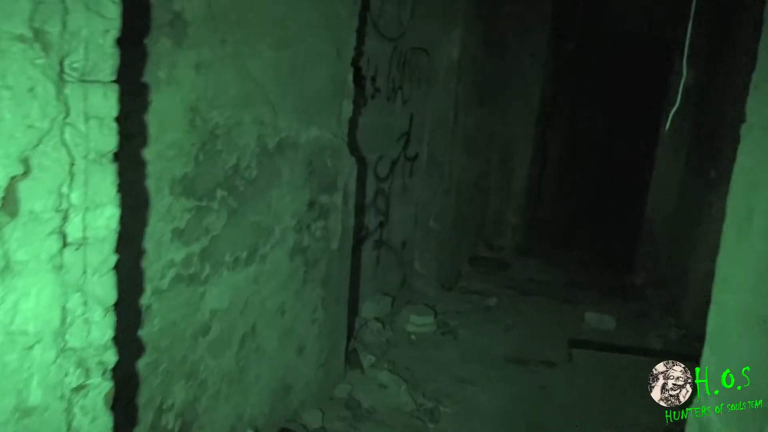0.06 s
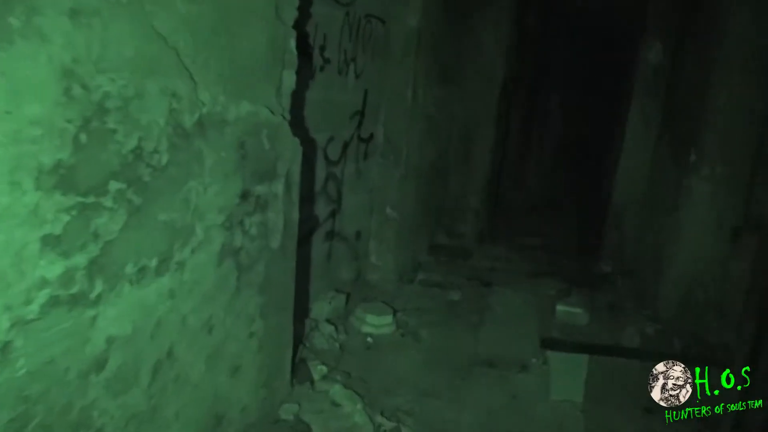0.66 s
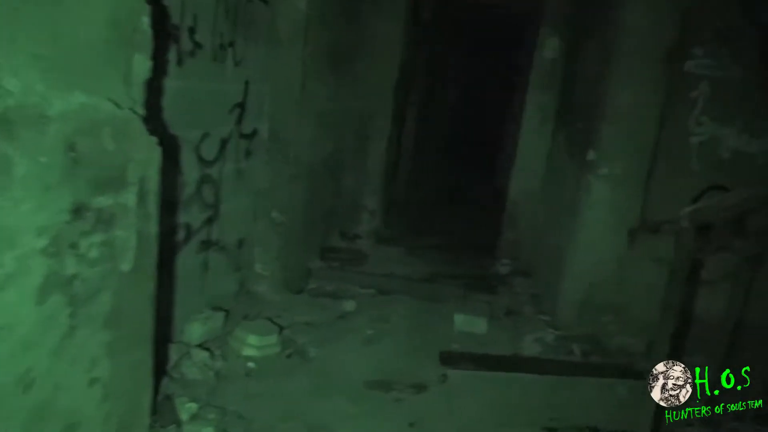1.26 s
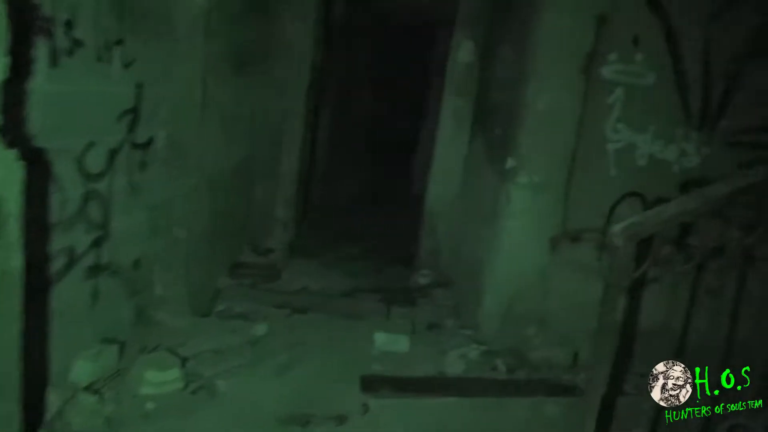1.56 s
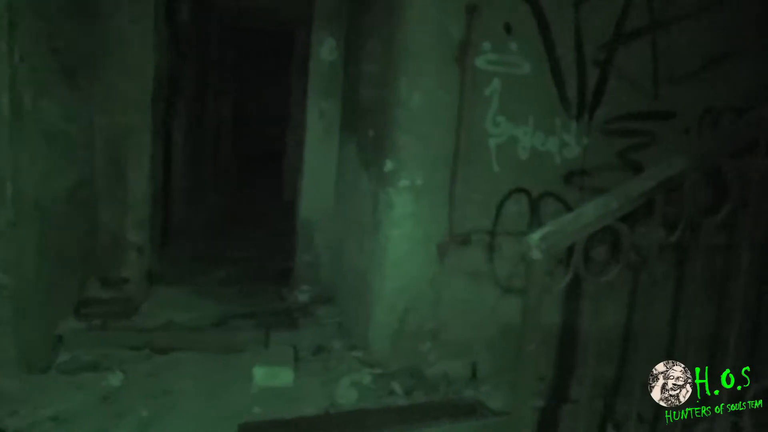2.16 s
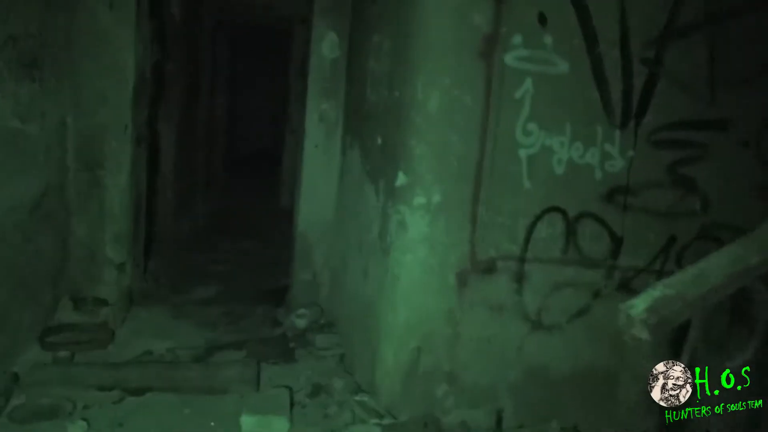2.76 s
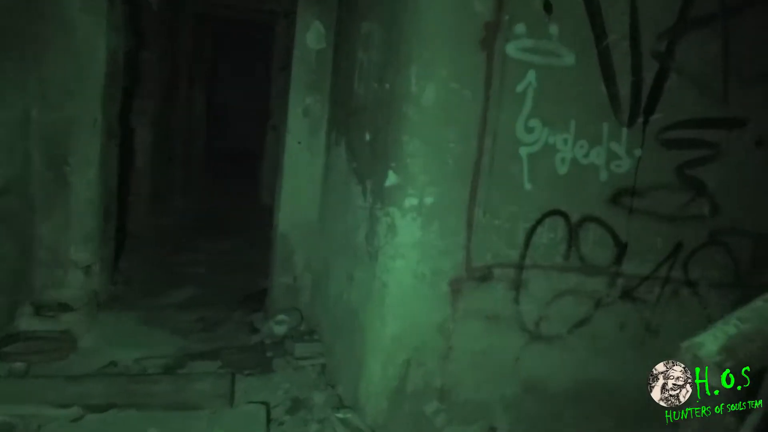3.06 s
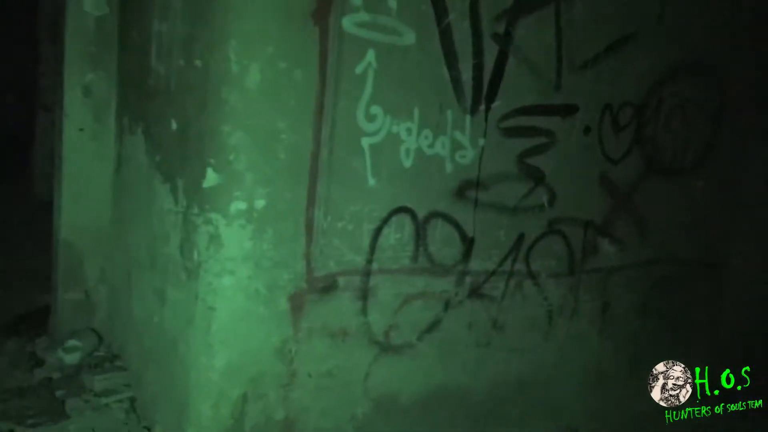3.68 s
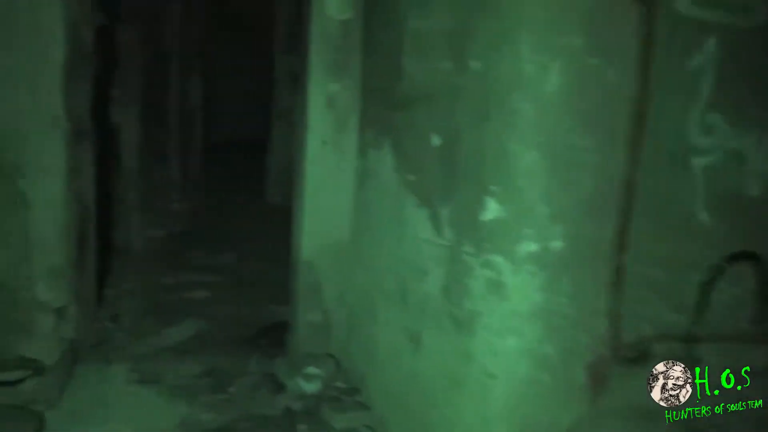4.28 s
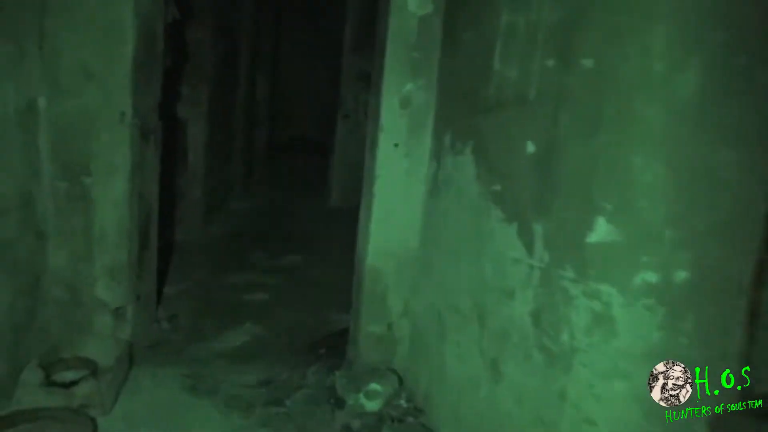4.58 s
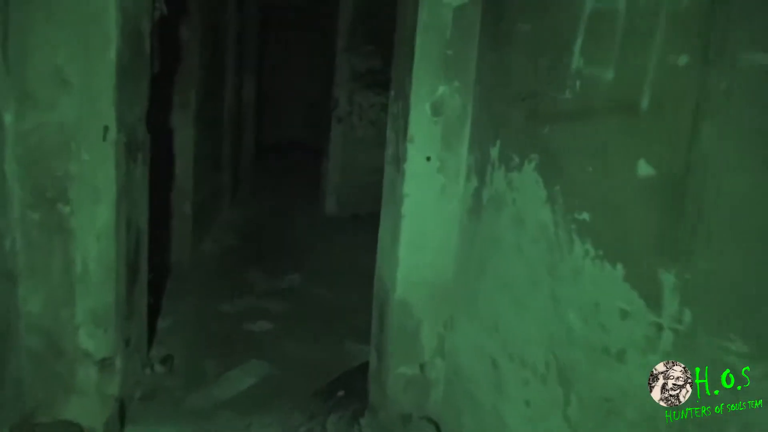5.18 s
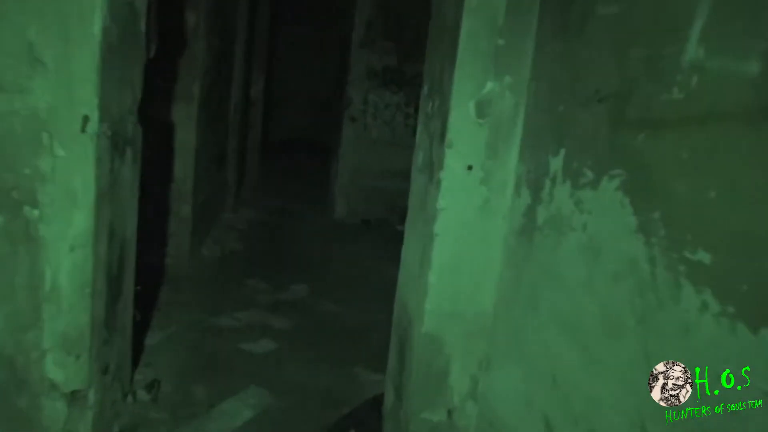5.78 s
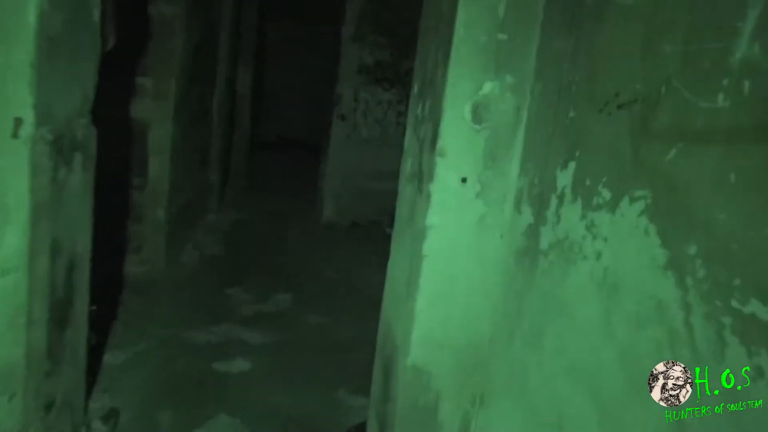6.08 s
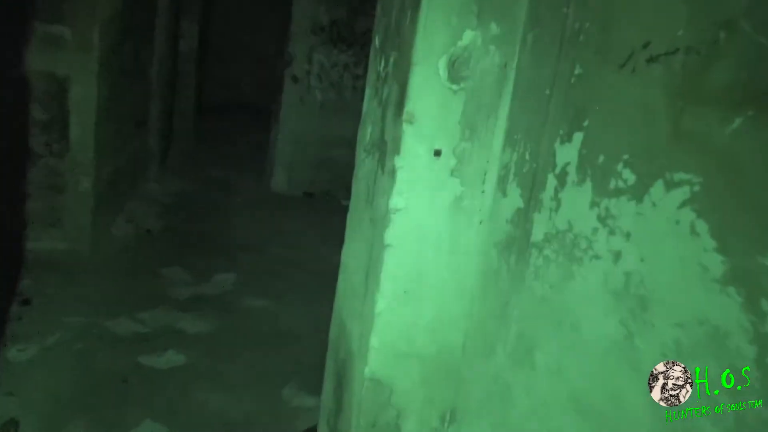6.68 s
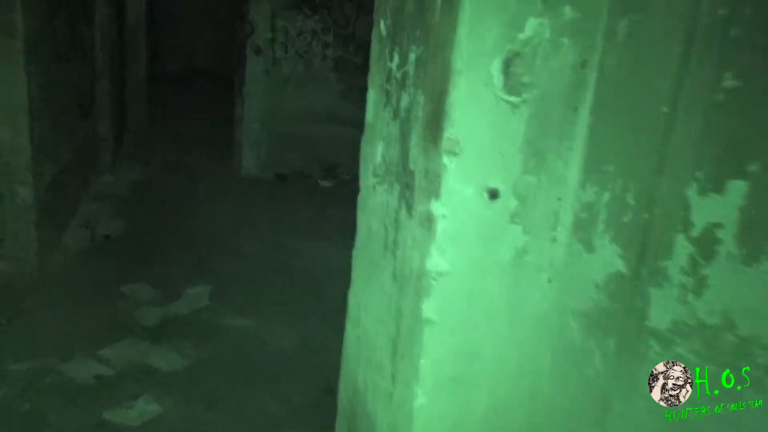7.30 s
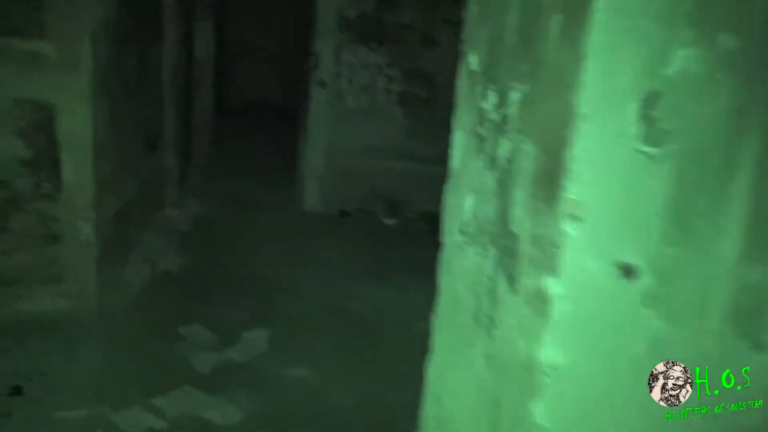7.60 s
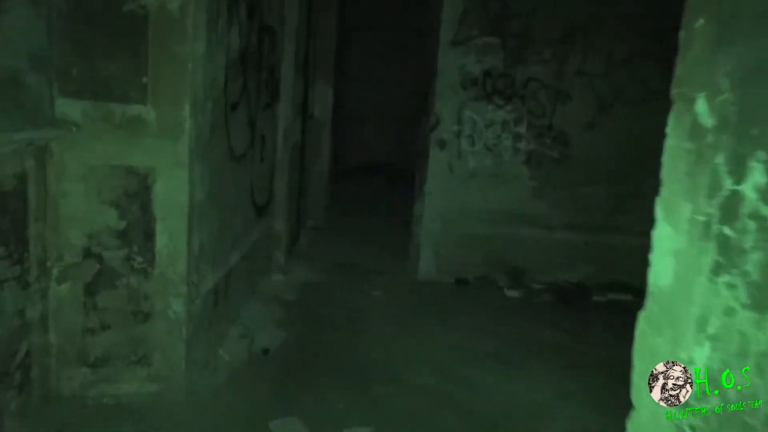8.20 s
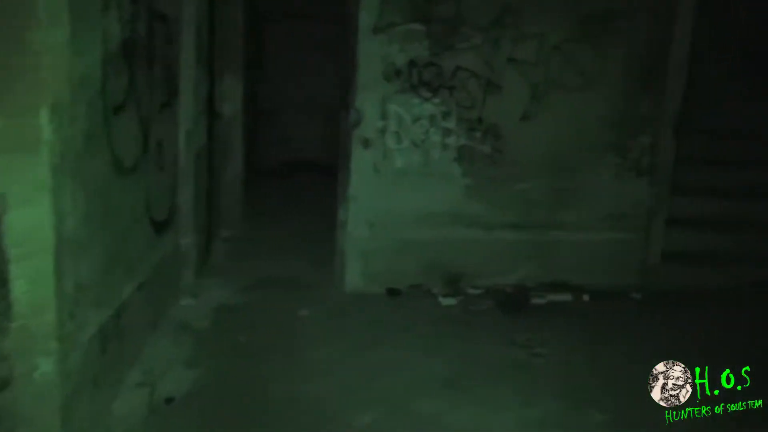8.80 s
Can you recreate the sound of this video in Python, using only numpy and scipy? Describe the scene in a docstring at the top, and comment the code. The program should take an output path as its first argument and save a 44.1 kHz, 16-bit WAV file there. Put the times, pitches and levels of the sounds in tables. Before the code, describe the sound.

Slow, uneven footsteps scuff and crunch across a debris-covered floor in an abandoned building, ringing briefly off hard walls. A few firm steps give way to lighter scrapes, then denser crackling and snapping chips, the loudest just before the end. Low handling rumble and soft knocks from the carried microphone run underneath with a faint steady hiss.

```python
"""Bare concrete building: slow footsteps over rubble, heard from a handheld camera.
Soles crush and drag grit, a dense train of tiny fractures. Plaster chips snap, heels thud,
and the hard rooms ring after each. Loose grit crackles on between strokes.
Underneath: bumps and deep rumble from the carried camera, and a faint steady hiss."""
import sys
import numpy as np
from scipy import signal
from scipy.fft import rfft, irfft, next_fast_len
from scipy.io import wavfile
from scipy.ndimage import uniform_filter1d, minimum_filter1d, map_coordinates

SR = 44100
rng = np.random.default_rng(int(sys.argv[2]) if len(sys.argv) > 2 else 0)


def wav_out(sig):
    """Save sig, one row per channel (or a flat mono array), as 16-bit PCM at SR to the path in sys.argv[1]."""
    wavfile.write(sys.argv[1], SR, np.round(np.clip(np.atleast_2d(sig).T, -1, 1) * 32767).astype(np.int16))


N = 399105

# Levels are relative within each table.
# foot crushing grit: (time [s], level [dB], weight re level [dB], sand re level [dB])
FOOTFALLS = [(0.319, -33.5, -12, -17), (.984, -33, -3, -5.5), (1.186, -32.5, -3.5, -9.5),
             (1.429, -34, -14, -9), (5.413, -35, -23, -2), (5.807, -34.5, -4, -9.5),
             (5.954, -36.5, -2, -15), (7.058, -29.5, 0, -6), (7.648, -27.5, -5, -3.5)]
# sole dragging: (time [s], length [s], level [dB], weight re level [dB], sand re level [dB])
SOLE_DRAGS = [(.247, 0.078, -41.5, -2.5, -9), (0.345, 0.085, -38, -1, -15), (0.498, 0.021, -46.5, 5, -6),
              (0.723, 0.096, -45, -2, -10.5), (1.005, 0.046, -38, -8, -7.5), (1.638, 0.12, -43.5, -3, -6),
              (1.873, .16, -52.5, -1, -3.5), (2.5, 0.15, -52, 1.5, -10), (2.794, 0.21, -54.5, 5.5, -3),
              (3.065, .13, -36.5, -5, -7), (3.197, 0.12, -35, -13, -12.5), (3.38, 0.085, -45.5, -1, -5.5),
              (3.983, 0.3, -48.5, 1, -11), (4.248, 0.14, -45.5, -12, -9), (4.902, 0.11, -31.5, -18, -17.5),
              (5.217, 0.073, -37.5, 1.5, -6), (5.435, 0.084, -39, -19, -11), (5.653, 0.16, -44.5, -12, -10),
              (6.016, 0.1, -46, 4.5, -4.5), (6.282, 0.063, -39.5, -1, -7.5), (7.082, 0.15, -39, -5.5, -16),
              (7.571, 0.11, -38, -7, -4.5), (7.68, 0.056, -33.5, -5, -7), (7.8, .15, -39, -3.5, -10.5),
              (8.335, 0.36, -45.5, -14, -12.5), (8.523, 0.054, -35.5, -14, -24),
              (8.715, 0.097, -41.5, -31, -14)]
# toe turning on fine sand: (time [s], length [s], level [dB])
TOE_TWISTS = [(0.882, 0.14, -47.5), (1.201, 0.027, -36.5), (2.773, 0.086, -52.5), (2.862, 0.082, -48.5),
              (4.669, 0.069, -41.5), (4.854, 0.042, -44.5), (6.56, 0.045, -45.5), (6.667, 0.027, -44.5),
              (6.762, 0.013, -42.5), (6.863, 0.15, -50)]
# chip snapping underfoot: (time [s], peak [dB], pitch [Hz], sharp edge [dB])
CHIP_SNAPS = [(.336, -12.5, 4220, -3), (.527, -14.5, 597, -9), (0.99, -15.5, 1860, -5),
              (0.998, -14, 1540, -12), (1.191, -9, 1690, 7), (1.439, -11, 1750, -9),
              (2.48, -26.5, 620, -11), (3.805, -14.5, 1950, -16), (4.213, -21.5, 1400, -14),
              (4.395, -21.5, 1620, -12), (4.637, -13, 1760, -4), (4.917, -7.5, 3240, 6),
              (4.987, -12.5, 1470, -6), (4.998, -21, 1480, -2), (5.779, -14.5, 856, -1),
              (5.788, -15, 1730, -2), (5.81, -14, 3800, -8), (5.869, -8.5, 1013, -23),
              (5.877, -11.5, 840, -24), (5.921, -16.5, 900, -12), (5.928, -14, 1444, -21),
              (6.173, -6, 1410, 3.5), (6.414, -17, 1960, -8), (6.768, -25, 3550, 3),
              (7.136, -11.5, 3050, -3), (7.308, -17.5, 3260, -7), (7.489, -16, 3500, 9),
              (7.775, -16, 1840, -10), (8.523, 0.5, 1500, 1.5), (8.525, -10.5, 800, -6),
              (8.532, -5.5, 1760, -13)]
# heel loading the floor or a loose board: (time [s], level [dB], pitch [Hz], nominal width [Hz], t60 [s])
HEEL_THUDS = [(.99, -30.5, 181, 198, 0.82), (1.432, -26.5, 159.4, 54, 0.39), (3.3, -41, 138, 26, 1.0),
              (5.085, -35.5, 533, 342, 0.57), (5.411, -20, 147, 91, 0.083), (5.413, -21, 132, 21, 0.38),
              (5.425, -25.5, 219, 171, 0.46)]
# grit squealing under a sole: (time [s], level [dB], pitch [Hz], nominal width [Hz], t60 [s])
GRIT_SQUEALS = [(.325, -32.5, 4770, 700, 0.19), (1.127, -49, 12300, 149, 0.13),
                (1.218, -17.5, 3620, 950, 0.073), (2.93, -42, 5860, 1100, 0.37),
                (4.71, -36, 4660, 350, 0.38), (5.812, -29, 5230, 942, 0.12), (7.07, -23, 4740, 1300, 0.12)]
# sand grain bursting close by: (time [s], peak [dB])
SAND_TICKS = [(.3376, -25), (.603, -38), (1.6018, -36), (4.342, -37), (5.025, -30), (5.4236, -22),
              (5.78, -29), (6.331, -31), (6.575, -22.5), (6.676, -26), (6.93, -27.5), (6.9717, -23),
              (7.067, -19), (7.2494, -32), (7.3602, -34), (7.4024, -35), (7.4709, -35), (8.081, -38),
              (8.522, -27)]
# crackle under the standing foot, loudest by the doorway: (time [s], level [dB])
LOOSE_GRIT = [(0, -70), (1.2, -56), (2.2, -62.5), (3.8, -64.5), (5.55, -49.5), (5.8, -43.5), (6.5, -47.5),
              (8.2, -53.5), (9.05, -56.5)]
# hand bumping the camera: (time [s], level [dB], pitch [Hz], nominal width [Hz], t60 [s])
HAND_BUMPS = [(.62, -26.5, 75.6, 42, 0.26), (1.03, -24, 81, 52, 0.98), (5.91, -20.5, 65.6, 130, 0.095),
              (6.84, -22.5, 60.7, 14, 0.52), (7.115, -20, 88.5, 12, 0.29), (7.69, -26.5, 64, 30, 0.55),
              (7.86, -24, 60, 37, 0.19), (8.09, -31.5, 86, 39, 0.34)]
# spectra: (frequency [Hz], density [dB])
SCRAPE_SPECTRUM = [(300, -18.5), (700, -7), (1100, -0.5), (1650, 5), (2100, -2), (2700, -12.5), (4000, -17),
                   (9000, -51)]  # coarse grit, midrange
WEIGHT_SPECTRUM = [(70, -28), (150, 1), (300, 4.5), (650, -0.5), (1000, -5.5), (2000, -54)]  # dull load of the foot
BITE_SPECTRUM = [(1200, -29), (2200, -6.5), (2900, -3), (3700, 3.5), (4600, -8), (6000, -23.5),
                 (9000, -32.5), (16000, -57)]  # hard edge of the grit
SAND_SPECTRUM = [(3000, -9), (4800, 5.5), (6000, 2), (8000, -3.5), (12500, -9.5), (16000, -22)]  # fine sand, treble
RUMBLE_SPECTRUM = [(4, -25.5), (9, 1), (17, 5.5), (28, -1), (40, -11.5), (52, -25), (72, -30), (90, -27),
                   (110, -38), (170, -50), (400, -100)]  # camera handling
HISS_SPECTRUM = [(60, -49), (90, -17), (125, -5.5), (200, -1.5), (400, -5.5), (800, -11), (1200, -10),
                 (1700, -9.5), (2500, -18.5), (3700, -9), (4800, -21.5), (6500, -28.5), (12500, -36),
                 (16000, -41)]  # background hiss
# ring of the rooms: (frequency [Hz], t60 [s])
ROOM_DECAY = [(120, 2.05), (400, 1.36), (1500, 1.05), (4000, 0.83), (8000, 0.83), (15000, 0.63)]


def footwork(twist_mix_db=(1.5, -7.5, 6.5, 0.5)):
    """Sole pressure as four envelopes: scrape, weight, bite, sand. Overlapping strokes add in power."""
    crush = stroke(rise_s=0.0092, hold_s=0.013, t60_s=0.23)
    soles = [(s, db, crush, weight_db, sand_db) for s, db, weight_db, sand_db in FOOTFALLS]
    for s, length_s, db, weight_db, sand_db in SOLE_DRAGS:
        soles.append((s, db, drag(length_s), weight_db, sand_db))
    moves = []
    for s, db, pressure, weight_db, sand_db in soles:
        bite_db = 3.5 + 0.26 * sand_db  # sandier spots bite harder
        moves.append((s, db, pressure, (0, weight_db, bite_db, sand_db)))
    for s, length_s, db in TOE_TWISTS:
        twist = stroke(rise_s=0.34 * length_s, hold_s=0.66 * length_s, t60_s=0.14)
        moves.append((s, db, twist, twist_mix_db))
    power = np.zeros((4, N))
    for s, db, pressure, mix_db in moves:
        for layer, layer_db in zip(power, mix_db):
            add(layer, s, (pressure * amp(db + layer_db)) ** 2)
    return np.sqrt(power)


def stroke(rise_s, hold_s, t60_s):
    """Sole pressure builds, holds, lets go."""
    t = np.arange(SR) / SR
    return np.minimum(t / rise_s, 1) * amp(-60 * np.maximum(t - rise_s - hold_s, 0) / t60_s)


def drag(length_s, catch_s=0.0047, catch_db=-3.5, lean_share=0.4):
    """A sole catches on rubble, leans in, slides, lifts."""
    lean = np.minimum(np.arange(SR) / SR / (lean_share * length_s), 1)
    return stroke(catch_s, length_s - catch_s, t60_s=0.3) * amp(catch_db * (1 - lean))


def scuffs(scrape, weight, bite, sand):
    """Crushed grit: mid scrape, dull weight below, hard bite and fine sand above."""
    coarse = grains(per_s=2800, spread_db=3)
    medium = grains(per_s=2500, spread_db=1)
    fine = grains(per_s=11000, spread_db=4)
    crunch = scrape * colour(coarse, SCRAPE_SPECTRUM) + weight * colour(coarse, WEIGHT_SPECTRUM)
    crunch += bite * colour(0.5 * coarse + medium, BITE_SPECTRUM)
    fizz = sand * colour(fine, SAND_SPECTRUM)
    grit = mottle(crunch, depth_db=5) + mottle(fizz, depth_db=2.5)
    return grit * wander(depth_db=1.04, rate_hz=108.7)  # uneven grip


def grains(per_s, spread_db):
    """Random train of tiny fractures: most small, a few large."""
    size = amp(spread_db * np.minimum(rng.exponential(1, N), 4))
    return unit(size * rng.choice([-1, 1], N) * (rng.random(N) < per_s / SR))


def mottle(x, depth_db, patch_hz=330, patch_s=0.03):
    """Each bit of grit rings at its own pitch: brief random peaks and dips in the spectrum."""
    hz, t, spectrum = signal.stft(x, SR, nperseg=512, noverlap=384)
    grid = np.array(np.meshgrid(hz / patch_hz, t / patch_s, indexing="ij"))
    spots = map_coordinates(rng.standard_normal((200, 900)), grid, order=1, mode="wrap")
    gain = unit(amp(depth_db * spots))
    return signal.istft(spectrum * gain, SR, nperseg=512, noverlap=384)[1][:N]


def chip_snaps(crumbs_db=-19.5, crumbs_t60_s=0.029, top_hz=4600, wall_gain=0.25):
    """A chip breaks in two stages and rings briefly; crumbs follow; a near wall echoes it."""
    t, out = np.arange(SR // 8) / SR, np.zeros(N)
    lowpass = signal.butter(N=6, Wn=top_hz, fs=SR, output="sos")
    for s, db, hz, edge_db in CHIP_SNAPS:
        force = rng.standard_normal(len(t)) * amp(crumbs_db - 60 * t / crumbs_t60_s)
        force[0] = 1
        force[int(SR * rng.uniform(0.0012, 0.0028))] = 0.29  # second break
        ring = unit(resonate(force, hz, width_hz=356.8))
        edge = unit(resonate(resonate(force, 2870, width_hz=3600), 2840, width_hz=3400))
        snap = signal.sosfilt(lowpass, resonate(ring, 1760, width_hz=3300) + amp(edge_db) * edge)
        snap *= amp(db) / abs(snap).max()
        add(out, s, snap)
        add(out, s + rng.uniform(0.007, 0.009), wall_gain * snap)
    return out


def heel_thuds():
    """Heels excite low modes of the floor or a loose board."""
    return mode_clusters(HEEL_THUDS, rise_s=0.0033)


def grit_squeals():
    """Grit rubbed under a sole rings high and short."""
    return mode_clusters(GRIT_SQUEALS, rise_s=0.0047)


def sand_ticks(t60_s=0.045):
    """Single grains burst with a short bright spit."""
    t, out = np.arange(SR // 16) / SR, np.zeros(N)
    for s, db in SAND_TICKS:
        spit = colour(rng.standard_normal(len(t)), SAND_SPECTRUM) * amp(-60 * t / t60_s)
        spit = resonate(spit, 8300, width_hz=9700)
        add(out, s, amp(db) * spit / abs(spit).max())
    return out


def grit_crackle(scrape, sand_db=-13, settle_db=-15, settle_s=0.086):
    """Sparse grains give way under the resting foot and settle after each stroke."""
    pops = grains(per_s=240, spread_db=4)
    pole = np.exp(-1 / (settle_s * SR))
    disturbed = np.sqrt(signal.lfilter([1 - pole], [1, -pole], scrape ** 2))
    resting = amp(np.interp(np.arange(N) / SR, *np.transpose(LOOSE_GRIT)))
    crackle = colour(pops, BITE_SPECTRUM) + amp(sand_db) * colour(pops, SAND_SPECTRUM)
    return np.hypot(resting, amp(settle_db) * disturbed) * mottle(crackle, depth_db=4.5)


def room_ring(x, build_s=0.013):
    """Dense reflections off bare walls; treble dies first."""
    hz, t, spectrum = signal.stft(rng.standard_normal(SR * 3 // 2), SR, nperseg=256)
    decay = amp(-60 * t / at_hz(ROOM_DECAY, hz)[:, None])
    tail = signal.istft(spectrum * decay, SR, nperseg=256)[1]
    tail *= np.clip(np.arange(len(tail)) / SR / build_s - 0.5, 0, 1)
    return signal.fftconvolve(x, tail / np.linalg.norm(tail))[:N]


def hand_bumps():
    """The hand knocks the camera: low, dull rings."""
    return mode_clusters(HAND_BUMPS, rise_s=0.0069)


def camera_rumble(start_db=-13.5, growth_db_per_s=0.2138, soft_limit=0.85):
    """Deep handling noise; grows as the hand gets less steady."""
    rumble = colour(rng.standard_normal(N), RUMBLE_SPECTRUM)
    rumble /= np.sqrt(uniform_filter1d(rumble ** 2, size=SR // 10) + 0.06)  # evens the level
    rumble *= amp(start_db + growth_db_per_s * np.arange(N) / SR) * wander(depth_db=1.8, rate_hz=8)
    return rumble / (1 + (rumble / soft_limit) ** 4) ** 0.25


def hiss(level_db=-46):
    """Faint broadband noise with a slight flicker."""
    noise = colour(rng.standard_normal(N), HISS_SPECTRUM)
    return amp(level_db) * noise * wander(depth_db=-0.8, rate_hz=10)


def mode_clusters(blows, rise_s):
    """Each blow excites close modes that decay together."""
    t, out = np.arange(SR) / SR, np.zeros(N)
    for s, db, hz, width_hz, t60_s in blows:
        band = resonate(rng.standard_normal(2 * SR), hz, 1.06 * width_hz)
        cluster = resonate(band, hz, 1.06 * width_hz)[SR:]
        envelope = np.minimum(t / rise_s, 1) * amp(-60 * t / t60_s)
        add(out, s, amp(db) * unit(cluster * envelope) * np.sqrt(np.mean(envelope ** 2)))
    return out


def wander(depth_db, rate_hz):
    """Randomly wandering gain, rms 1."""
    knots = rng.standard_normal(N // 20)
    return unit(amp(depth_db * np.interp(np.arange(N) * rate_hz / SR, np.arange(len(knots)), knots)))


def resonate(x, hz, width_hz):
    """Two-pole resonance."""
    return signal.lfilter(*signal.iirpeak(hz, hz / width_hz, fs=SR), x)


def colour(x, spectrum):
    """Shapes x by a spectrum, rms 1."""
    size = next_fast_len(len(x))
    gain = amp(at_hz(spectrum, np.fft.rfftfreq(size, 1 / SR)))
    return unit(irfft(rfft(x, size) * gain, size)[:len(x)])


def at_hz(table, hz):
    """Table lookup on a log-frequency axis."""
    knots_hz, values = np.transpose(table)
    return np.interp(np.log(hz + 1), np.log(knots_hz + 1), values)


def amp(db):
    """dB to gain."""
    return 10 ** (np.asarray(db) / 20)


def unit(x):
    """Scales to rms 1."""
    return x / np.sqrt(np.mean(x ** 2) + 1e-20)


def add(mix, start_s, sound):
    """Mixes a sound in at start_s."""
    part = mix[round(start_s * SR):][:len(sound)]
    part += sound[:len(part)]


def scene():
    """Feet and debris, room ring, camera, hiss; mono."""
    scrape, weight, bite, sand = footwork()
    grit = amp(-0.5) * scuffs(scrape, weight, bite, sand) + grit_squeals() + grit_crackle(scrape)
    chips = amp(-3) * chip_snaps()
    heels = amp(4) * heel_thuds()
    near = amp(-3.5) * sand_ticks() + hand_bumps()
    room = room_ring(amp(-6.5) * grit + amp(-6) * chips + amp(-8.5) * heels)
    return (grit + chips + heels + near + room + camera_rumble() + hiss())[None]


def record(dry, ceiling=0.96, cutoff_hz=15900):
    """Fast peak limiter, then low-pass."""
    gain = minimum_filter1d(ceiling / np.maximum(abs(dry), ceiling), size=801)
    limited = dry * uniform_filter1d(gain, size=801)
    lowpass = signal.firwin(511, cutoff_hz, window=("kaiser", 9), fs=SR)
    return signal.oaconvolve(limited, lowpass[None], "same")


dry = scene()
out = record(dry)
wav_out(out)
```